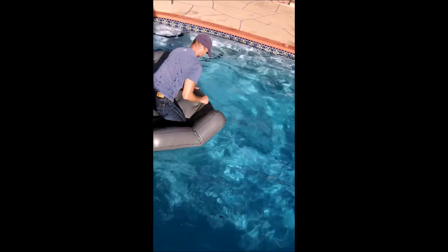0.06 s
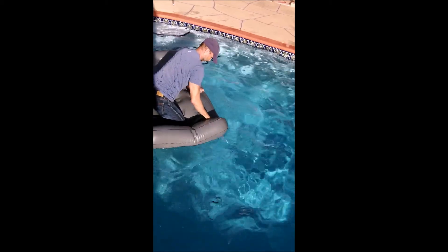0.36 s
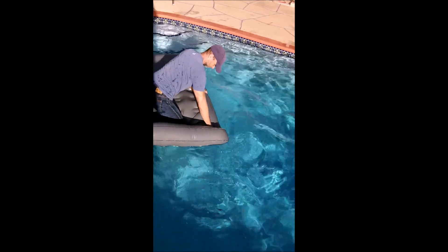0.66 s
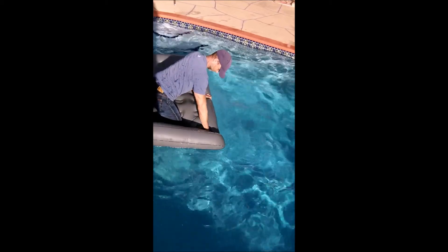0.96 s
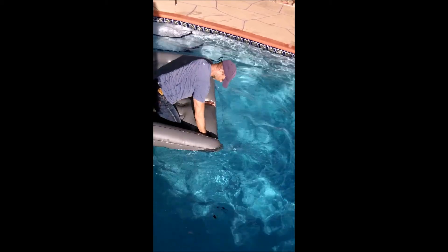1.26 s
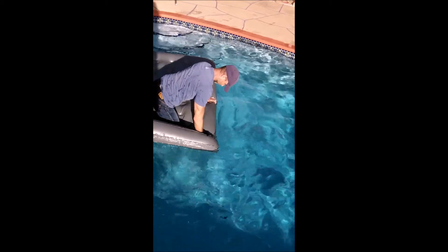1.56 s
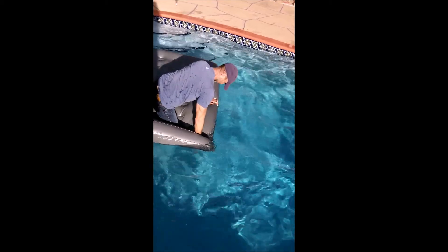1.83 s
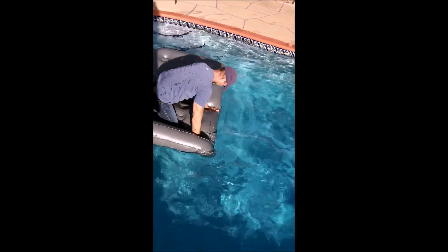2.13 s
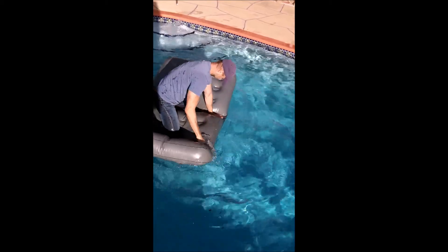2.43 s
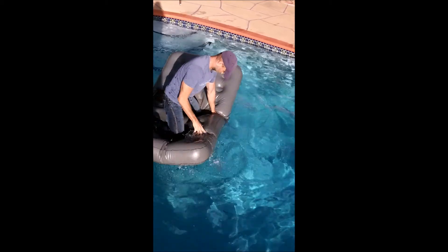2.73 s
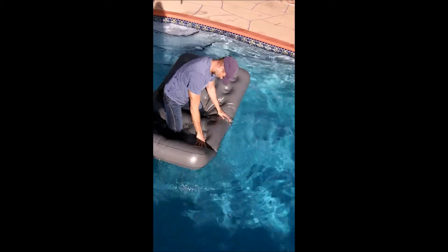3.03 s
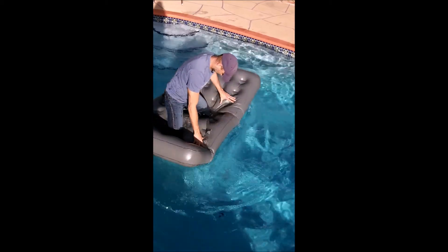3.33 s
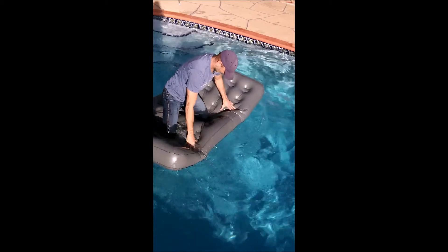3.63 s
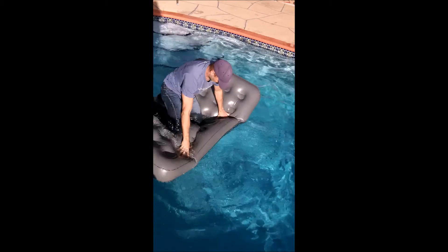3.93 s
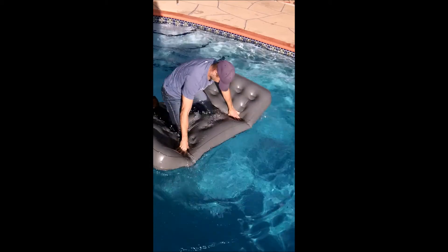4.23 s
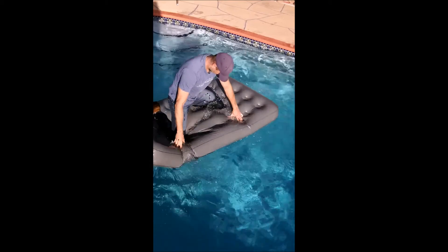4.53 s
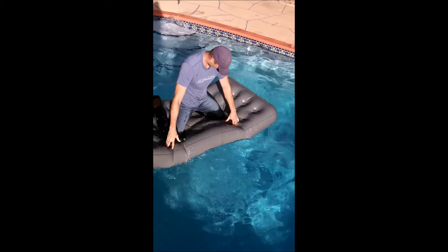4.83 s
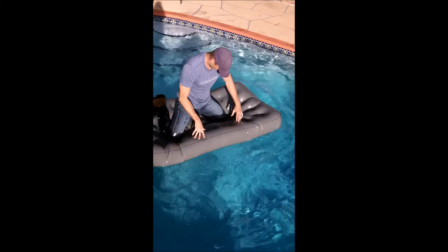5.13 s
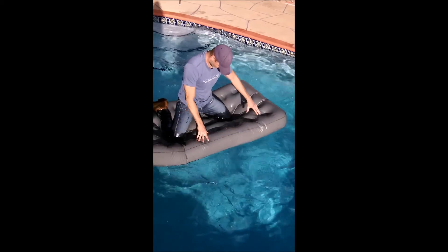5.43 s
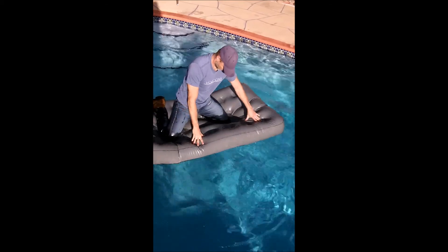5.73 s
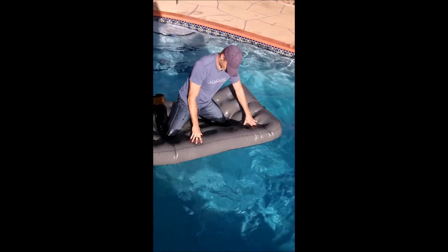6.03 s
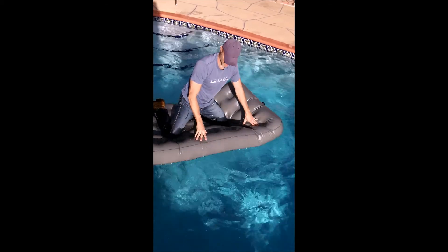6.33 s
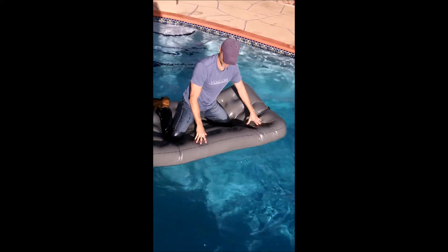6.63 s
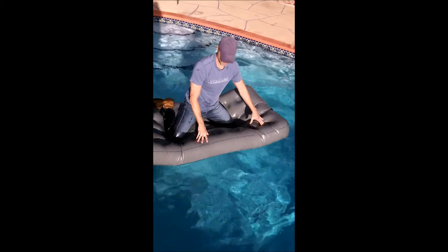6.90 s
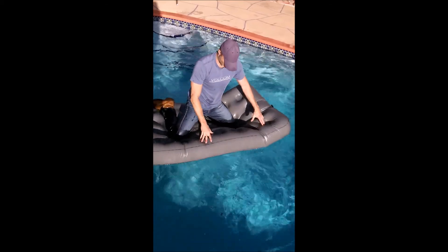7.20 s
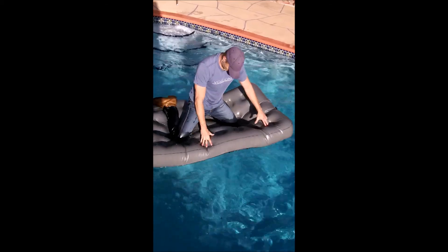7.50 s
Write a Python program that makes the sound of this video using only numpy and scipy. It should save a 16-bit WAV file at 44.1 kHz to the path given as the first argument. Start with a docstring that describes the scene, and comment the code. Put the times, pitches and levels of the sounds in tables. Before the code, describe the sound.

Pool water washes and gurgles around an air mattress, with a few hollow thumps and small slaps over a faint hum.

```python
"""An outdoor pool: someone kneeling on an air mattress shifts his weight, a few metres from a phone.
The mattress thumps on trapped air, slaps the water and squeezes out gurgles. The wash it pushes out
is a swarm of bubbles and spray, with single pops and gliding gulps. A pump hums, a distant motor
joins briefly, a breeze touches the microphone and the pool edge echoes faintly."""
import sys
import numpy as np
from scipy import signal
from scipy.fft import rfft, irfft, next_fast_len
from scipy.io import wavfile
from scipy.ndimage import uniform_filter1d

SR = 44100
rng = np.random.default_rng(int(sys.argv[2]) if len(sys.argv) > 2 else 0)


def waveform_to_disk(signal):
    """Save audio, clipped to [-1, 1], as 16-bit WAV at the path in sys.argv[1]."""
    frames = np.transpose(np.atleast_2d(signal))
    scaled = np.clip(frames, -1, 1) * 32767
    samples = np.round(scaled).astype(np.int16)
    wavfile.write(sys.argv[1], SR, samples)


N = 333376
TIME = np.arange(N) / SR


def undb(db):
    """Decibels to gain."""
    return 10 ** (np.asarray(db) / 20)


def unit(x):
    """Scale to rms 1."""
    return x / np.sqrt(np.mean(x ** 2) + 1e-20)


def add(out, start_s, x):
    """Mix x into out from start_s."""
    i = int(np.clip(start_s * SR, 0, N - 1))
    out[i:i + len(x)] += x[:N - i]


def colour(x, points):
    """Filter by (frequency [Hz], gain [dB]) points; 12 dB/octave roll-off outside them."""
    hz, db = np.transpose(points)
    size = next_fast_len(N + 4096)
    bin_hz = np.maximum(np.fft.rfftfreq(size, 1 / SR), 1)
    gain = undb(np.interp(np.log(bin_hz), np.log(hz), db))
    low_cut = np.minimum(bin_hz / hz[0], 1) ** 2
    high_cut = np.minimum(hz[-1] / bin_hz, 1) ** 2
    return irfft(rfft(x, size) * gain * low_cut * high_cut, size)[:N]


def band(x, hz, ratio):
    """Band-pass from hz / ratio to hz * ratio."""
    return signal.sosfilt(signal.butter(2, [hz / ratio, hz * ratio], "band", fs=SR, output="sos"), x)


def wander(rate_hz, t=TIME, count=2048):
    """Slow random curve, spread near 1."""
    return np.interp(t * rate_hz, np.arange(count), rng.standard_normal(count))


def bubble(hz, decay_s, rise_oct_per_s, attack_s):
    """Damped bubble ring, peak 1; the pitch glides for two decay times, then holds."""
    t = np.arange(int(2 * np.pi * decay_s * SR) + 20) / SR
    pitch_hz = hz * 2 ** (rise_oct_per_s * np.minimum(t, 2 * decay_s))
    phase = 2 * np.pi * np.cumsum(pitch_hz) / SR
    x = np.sin(phase) * np.exp(-t / decay_s) * (1 - np.exp(-t / attack_s))
    return x / np.abs(x).max()


def pop(hz):
    """A small cavity snaps shut and rings for a few cycles."""
    return bubble(hz, decay_s=2.4 / hz, rise_oct_per_s=9.8, attack_s=0.00012)


def swarm(low_hz, high_hz, cycles, spread_db, glide_oct, count):
    """Bubbles of random size and onset, a few much louder; levelled over 1/8 s."""
    out = np.zeros(N)
    for when, size, strength, damping in rng.random((count, 4)):
        hz = low_hz * (high_hz / low_hz) ** size
        decay_s = cycles * 2 ** (2 * damping - 1) / hz
        gain = undb(spread_db * min(-np.log(1 - strength), 5)) * hz / low_hz
        add(out, when * N / SR, gain * bubble(hz, decay_s, glide_oct / decay_s, attack_s=0.13 / hz))
    return out / np.sqrt(uniform_filter1d(out ** 2, SR // 8) + 1e-9)


def yard_air(rms_db=-47):
    """Steady outdoor rumble and hiss."""
    # air spectrum: (frequency [Hz], gain [dB])
    spectrum = [(15, -46), (25, -12), (54, -10), (131, -0.5), (301, -5.5), (394, -4.5), (501, -7.5),
                (811, -9.5), (2370, -17), (6200, -33), (6900, -33.5), (8100, -32), (8780, -36), (9770, -31),
                (15000, -31.5)]
    return unit(colour(rng.standard_normal(N), spectrum)) * undb(rms_db)


def pump():
    """Pump hum; each partial wavers in level and phase."""
    # hum partials: (frequency [Hz], rms level [dB])
    partials = [(63.5, -52), (129, -54.5), (199, -60.5), (332, -70)]
    out = np.zeros(N)
    for hz, db in partials:
        amplitude = np.sqrt(2) * undb(db + 2 * wander(6))
        out += amplitude * np.sin(2 * np.pi * hz * TIME + 1.22 * wander(11))
    return out


def breeze(calm_db=-53):
    """Soft gusts buffet the microphone over a calm floor."""
    # gusts: (time [s], level [dB], half width [s])
    gusts = [(0.69, -40, 0.077), (1.11, -38, 0.12), (1.483, -39.5, 0.13), (1.957, -41, 0.055),
             (3.096, -41.5, 0.049), (3.8, -38.5, 0.18)]
    rumble = unit(colour(rng.standard_normal(N), [(14, 2), (35, -1), (80, -5), (160, -17), (300, -22)]))
    gust_power = sum(undb(db) ** 2 * np.exp(-((TIME - s) / half_s) ** 2) for s, db, half_s in gusts)
    return rumble * np.sqrt(undb(calm_db) ** 2 + gust_power)


def distant_motor(base_hz=67.9, level_db=-51, start_s=2.48, end_s=3.14, fade_s=0.13):
    """A second motor hums for a moment, with a little flutter."""
    # motor harmonics: (order, relative level [dB])
    harmonics = [(2, 3.5), (3, -1.5), (4, -2), (5, -0.5), (6, 3), (8, -2.5)]
    phase = 2 * np.pi * base_hz * TIME + 0.1 * wander(20)
    swell = np.exp(-np.abs(TIME - np.clip(TIME, start_s, end_s)) / fade_s)
    hum = sum(undb(db + 2.5 * wander(9.9)) * np.sin(k * phase + k * k) for k, db in harmonics)
    return hum * undb(level_db) * swell


def poolside(x, tail_db=-18, t60_s=0.28):
    """Add early echoes and a thin, dull open-air tail."""
    # echoes off pool edge and house: (delay [s], gain [dB])
    echoes = [(.0071, -25), (0.0187, -69), (0.033, -41)]
    t = np.arange(SR // 2) / SR
    envelope = np.exp(-np.log(1000) * t / t60_s) * (1 - np.exp(-t / 0.008))
    tail = band(rng.standard_normal(len(t)), 1200, ratio=3) * envelope
    response = undb(tail_db) * tail / np.sqrt(np.sum(tail ** 2))
    for delay_s, db in echoes:
        response[int(delay_s * SR)] += undb(db)
    return x + signal.fftconvolve(x, response)[:N]


def surges(ripple_db=-59.5, spray_rel_db=-8.5):
    """Envelopes of wash and spray: each weight shift pushes out a surge over slowly wavering ripples."""
    # surges: (crest time [s], level [dB], rise [s], fall [s], extra spray [dB])
    pushes = [(0.129, -51, 0.24, 0.41, 2), (.52, -47.5, 0.035, 0.075, -9), (1.84, -44, 0.026, .06, -8),
              (2.0, -43.5, 0.068, 0.026, 0), (2.23, -41.5, .07, 0.065, 6), (2.71, -33.5, 0.2, .17, -1.5),
              (2.85, -43, 0.036, 0.039, 2), (3.24, -46.5, 0.41, 0.42, 1), (3.6, -46.5, 0.33, 0.33, -1),
              (3.75, -35.5, 0.07, 0.022, -16), (3.99, -41, 0.21, 0.17, 1.5), (4.33, -31, 0.11, 0.21, -5),
              (4.45, -38, 0.076, 0.37, 0.5), (4.76, -39, 0.097, 0.21, -1), (5.08, -39.5, 0.076, 0.19, 1.5),
              (5.509, -44.5, 0.032, 0.045, -19.5), (5.819, -49.5, 0.097, 0.065, 7.5),
              (6.045, -46.5, 0.03, 0.071, 11.5), (6.56, -55, 0.093, 0.088, 8), (6.88, -58, 0.033, 0.065, 7)]
    flow_power = spray_power = undb(ripple_db - 1.5 * wander(7.8)) ** 2
    for crest_s, db, rise_s, fall_s, extra_db in pushes:
        push = undb(db) * np.exp(-np.maximum((crest_s - TIME) / rise_s, (TIME - crest_s) / fall_s))
        flow_power = flow_power + push ** 2
        spray_power = spray_power + (push * undb(extra_db)) ** 2
    return np.sqrt(flow_power), np.sqrt(spray_power) * undb(spray_rel_db)


def stray_droplets(flow, centre_hz=2060, spread_oct=0.52, count=45):
    """Droplets fall back at random, harder when the water is stirred up."""
    out = np.zeros(N)
    for k, (late, size, softness) in enumerate(rng.random((count, 3))):
        hz = centre_hz * 2 ** (spread_oct * (2 * size - 1))
        add(out, (k + late) / count * N / SR, undb(-13 - 10 * softness) * pop(hz))
    return out * flow ** 0.36


def wash(flow, spray_flow, crowd_db=-42, mist_db=-69.5):
    """Bubbles, deep churn and spray swell with each surge; above crowd_db bubbles blur into a rush."""
    # spectra of bubbles, churn and spray: (frequency [Hz], gain [dB])
    bubble_spectrum = [(350, 2), (600, -8.5), (1000, -2), (1600, -0.5), (2400, 0), (3300, -6.5),
                       (4500, -18.5), (7000, -58)]
    churn_spectrum = [(70, -52), (130, -4.5), (250, -3), (420, -8), (700, -4), (1200, 6.5)]
    spray_spectrum = [(2000, 5), (3500, 1.5), (5000, -1.5), (6800, -9.5), (8800, -41), (10500, -18.5),
                      (13000, -14), (15000, -39)]
    fizz = swarm(500, 4800, cycles=2.2, spread_db=3.2, glide_oct=0.05, count=7000)
    plinks = swarm(650, 3200, cycles=7, spread_db=2.2, glide_oct=0.09, count=700)
    distinct = 0.7 * np.minimum(undb(crowd_db) / flow, 1) ** 0.32
    rush = np.sqrt(1 - distinct ** 2) * rng.standard_normal(N)
    bubbles = distinct * (fizz + undb(-7) * plinks) + rush
    churn = swarm(127.3, 822, cycles=1.24, spread_db=1, glide_oct=0.048, count=1600)
    churn += rng.standard_normal(N)
    spray = swarm(3000, 7270, cycles=4, spread_db=3.6, glide_oct=0.028, count=5000)
    spray += undb(7) * rng.standard_normal(N)
    return (unit(colour(bubbles, bubble_spectrum)) * flow
            + unit(colour(churn, churn_spectrum)) * undb(-24) * flow ** 0.54
            + unit(colour(spray, spray_spectrum)) * np.hypot(spray_flow, undb(mist_db)))


def gulps_and_pops():
    """Single bubbles stand out of the wash; most large ones rise in pitch as they surface."""
    # large bubbles: (time [s], level [dB], pitch [Hz], decay [ms], rise [octaves/s])
    gulps = [(.462, -36.5, 1625, 9, -7.5), (1.385, -38, 984, 30, 16), (1.44, -39, 1636, 19, -3.5),
             (2.592, -26, 558, 19, 11.5), (2.6512, -18, 620, 2, 17), (3.142, -30, 1410, 4.1, 7),
             (3.236, -28, 1014, 15, 19.5), (3.514, -29, 965, 7, 34), (3.572, -27.5, 998, 13, 27),
             (3.719, -30.5, 1072, 31, 18.5), (3.74, -36.5, 1390, 16, 15.5), (4.407, -21.5, 990, 7.9, 21.5),
             (4.462, -21.5, 630, 3.1, 13), (4.787, -29, 877, 21, 8.5), (5.7095, -26, 1860, 3.9, 8),
             (6.023, -31.5, 840, 5.5, 8), (6.292, -24.5, 698, 13.7, 14), (6.32, -37, 833, 20, 3.5)]
    # small cavities: (time [s], level [dB], pitch [Hz])
    pops = [(.4312, -33, 2300), (.7372, -32, 2340), (1.8259, -22.5, 920), (2.227, -24, 1420),
            (2.323, -32.5, 5400), (2.4535, -13, 1750), (2.7677, -23, 2180), (2.8099, -21, 2250),
            (2.8353, -24, 1280), (2.87, -16.5, 1540), (3.068, -24.5, 2000), (3.9952, -21, 2290),
            (4.249, -26, 2890), (5.1116, -29, 1935), (5.8001, -25, 2220), (5.8169, -25, 2380),
            (5.8701, -19.5, 3670), (5.8709, -18, 2510), (6.3245, -33, 4000), (6.49, -28.5, 2310),
            (6.593, -31.5, 1950), (6.8836, -34, 3000)]
    # bubble spectrum, little top: (frequency [Hz], gain [dB])
    spectrum = [(60, -1.5), (2500, 1.5), (4300, 3), (6000, 2.5), (9000, -18)]
    out = np.zeros(N)
    for s, db, hz, decay_ms, rise_oct_per_s in gulps:
        tone = bubble(hz, decay_ms / 1000, rise_oct_per_s, attack_s=0.00019)
        wall_wobble = 1 + 0.1 * wander(450, TIME[:len(tone)], count=512)
        add(out, s, undb(db) * tone * wall_wobble)
    for s, db, hz in pops:
        add(out, s, undb(db) * pop(hz))
    return colour(out, spectrum)


def gurgles(count=40, spacing_s=0.0039, span_oct=1.2):
    """Air squeezed from under the mattress breaks into a dying run of big, heavily damped bubbles."""
    # air pockets: (time [s], level [dB], decay [s], centre pitch [Hz])
    pockets = [(.28, -41, .14, 251), (.54, -39, 0.26, 300), (2.061, -20, 0.029, 257),
               (2.059, -23.5, 0.049, 119), (2.105, -18.5, 0.037, 300), (3.724, -28.5, 0.04, 292),
               (3.85, -38.5, 0.11, 106), (4.101, -34, 0.067, 106), (4.41, -37, 0.046, 570),
               (2.655, -31, .05, 624)]
    out = np.zeros(N)
    for s, db, decay_s, centre_hz in pockets:
        for k, (late, size) in enumerate(rng.random((count, 2))):
            delay_s = (k + late) * spacing_s
            hz = centre_hz * 2 ** (span_oct * (size - 0.5))
            tone = bubble(hz, decay_s=1.5 / hz, rise_oct_per_s=0, attack_s=0.00024)
            add(out, s + delay_s, undb(db) * np.exp(-delay_s / decay_s) * tone)
    return out


def slaps():
    """A flat face cracks on the water, then spray patters away."""
    # slaps: (time [s], crack level [dB], spray level [dB], spray decay [s], centre [Hz])
    hits = [(1.827, -29, -40, 0.0046, 2530), (2.0567, -31, -45, .002, 7300),
            (2.4515, -30.5, -27, 0.0021, 2420), (2.87, -36, -27.5, 0.01, 1900),
            (3.237, -28, -31.5, 0.0086, 2220), (3.8432, -29, -31, .003, 1110),
            (3.8544, -33, -22, 0.007, 2310), (4.0936, -30, -28, .0069, 1460),
            (4.4068, -27, -33, .029, 2230), (6.0224, -17.5, -31, 0.0055, 2480),
            (6.491, -38, -42.5, 0.0055, 2960)]
    out = np.zeros(N)
    t = np.arange(SR // 4) / SR
    for s, crack_db, spray_db, decay_s, hz in hits:
        crack = band(signal.unit_impulse(len(t)), hz, ratio=1.7)
        droplets = rng.standard_normal(len(t)) * undb(1.3 * rng.standard_normal(len(t)))
        patter = unit(band(droplets, hz, ratio=1.426)) * np.exp(-t / decay_s)
        add(out, s, undb(crack_db) * crack / np.abs(crack).max() + undb(spray_db) * patter)
    return out


def thumps():
    """The hollow underside hits a cushion of trapped air, which swings back; softer blows ring longer."""
    # blows on the water: (time [s], peak level [dB], pitch [Hz], contact [ms])
    blows = [(.803, -22, 473, 0.85), (0.8223, -19, 460, 0.62), (1.1062, -25, 327, 0.99),
             (1.159, -26, 40, .4), (2.0563, -1.5, 303, .23), (2.058, -27, 60, 2.2),
             (2.0893, -16.5, 477, 0.43), (2.097, -12.5, 294, .28), (3.8416, -7, 160, 0.16),
             (4.0953, -11, 123, 0.35), (4.101, -16.5, 110, .14), (4.447, -23.5, 260, 0.36),
             (4.5722, -18.5, 490, 0.22)]
    out = np.zeros(N)
    t = np.arange(SR // 8) / SR
    for s, db, hz, contact_ms in blows:
        decay_cycles = 1.15 * min(contact_ms, 1) ** 0.8
        swing = np.cos(2 * np.pi * hz * t) * np.exp(-t * hz / decay_cycles)
        push = t * np.exp(-2 * t / (contact_ms / 1000))
        thump = signal.fftconvolve(swing, push)[:len(t)]
        add(out, s, -undb(db) * thump / np.abs(thump).max())
    return out


def scene():
    """Water, mattress and motor with poolside echoes, over air, pump and breeze; mono."""
    flow, spray_flow = surges()
    water = wash(flow, spray_flow) + stray_droplets(flow)
    impacts = thumps() + gurgles() + gulps_and_pops() + slaps()
    return (poolside(water + impacts + distant_motor()) + yard_air() + pump() + breeze())[None]


def record(dry):
    """The phone has a deep treble notch and cuts the top."""
    notch_hz, half_width_hz, top_hz = 7900, 600, 15300
    bin_hz = np.fft.rfftfreq(N, 1 / SR)
    notch = 1 - np.exp(-((bin_hz - notch_hz) / half_width_hz) ** 2)
    low_pass = signal.ellip(10, 0.2, 70, top_hz, fs=SR, output="sos")
    return signal.sosfilt(low_pass, irfft(rfft(dry) * notch, N))


dry = scene()
out = record(dry)
waveform_to_disk(out)
```